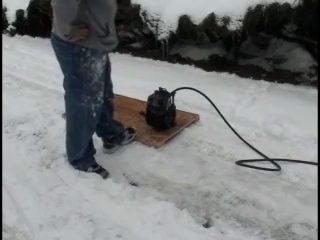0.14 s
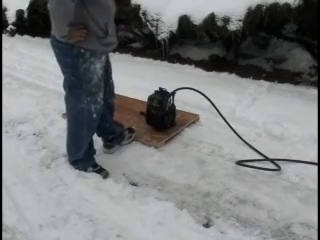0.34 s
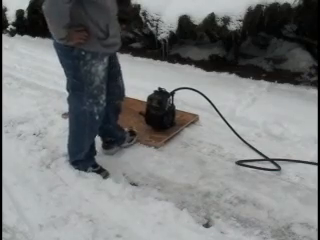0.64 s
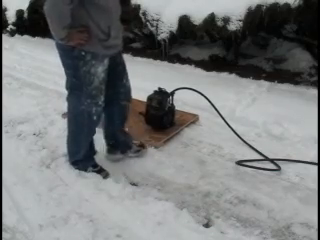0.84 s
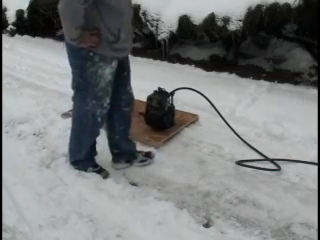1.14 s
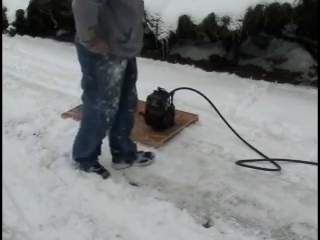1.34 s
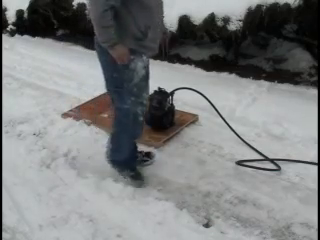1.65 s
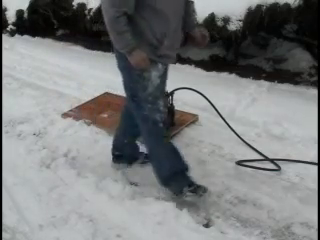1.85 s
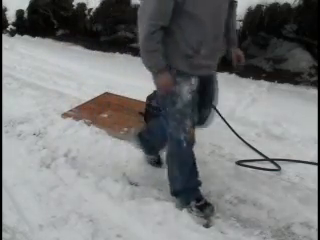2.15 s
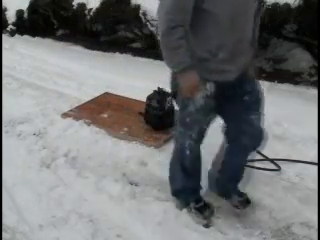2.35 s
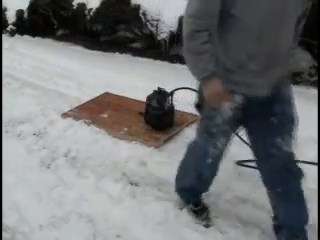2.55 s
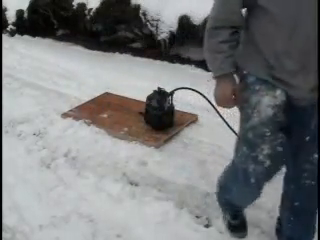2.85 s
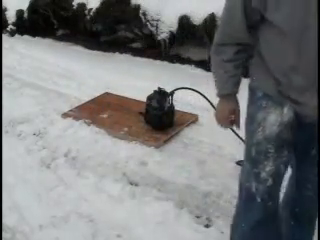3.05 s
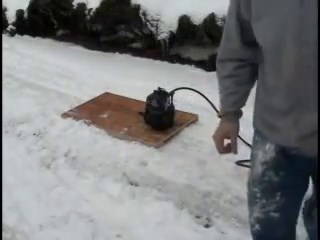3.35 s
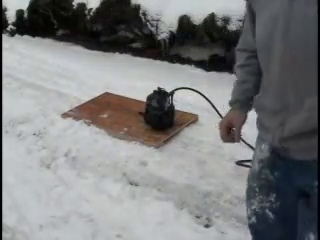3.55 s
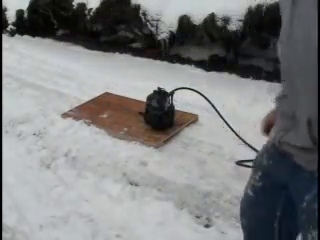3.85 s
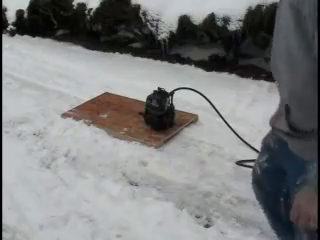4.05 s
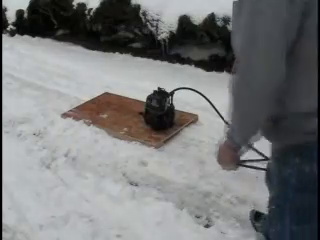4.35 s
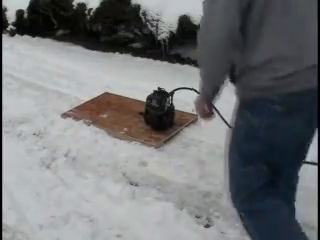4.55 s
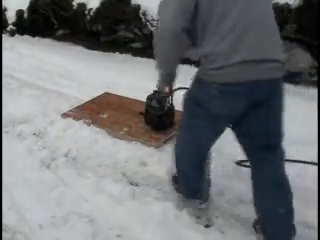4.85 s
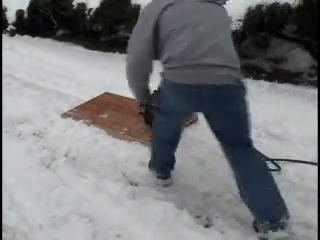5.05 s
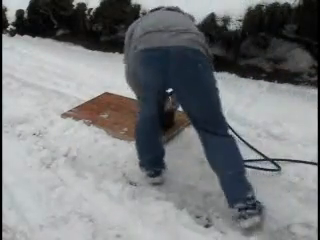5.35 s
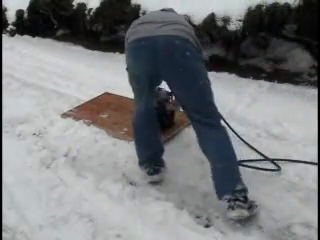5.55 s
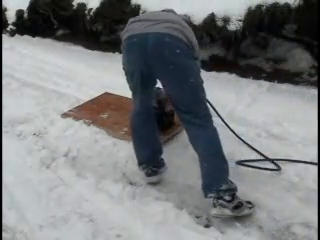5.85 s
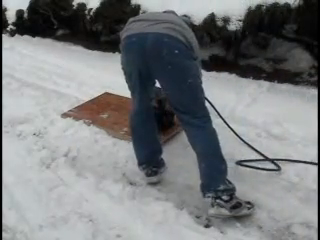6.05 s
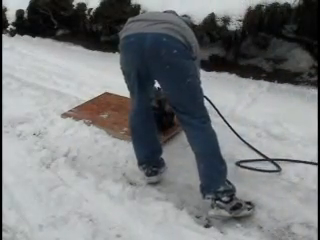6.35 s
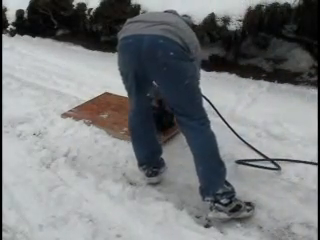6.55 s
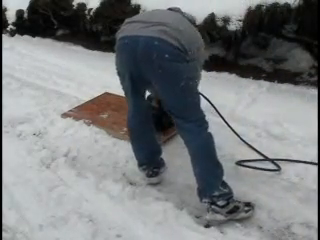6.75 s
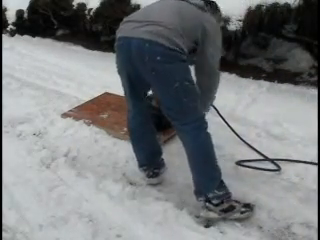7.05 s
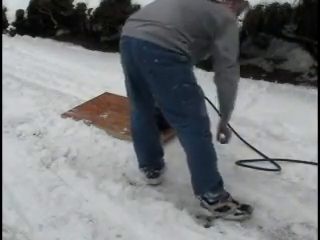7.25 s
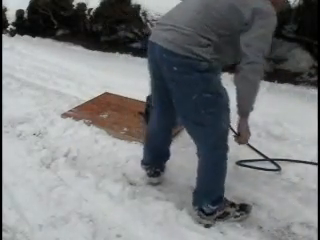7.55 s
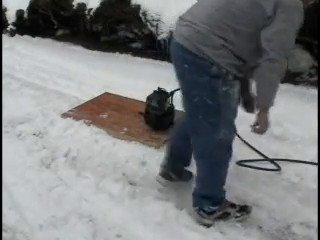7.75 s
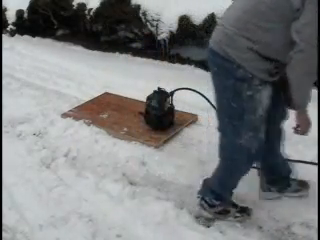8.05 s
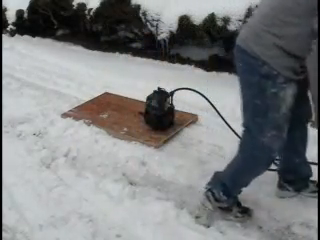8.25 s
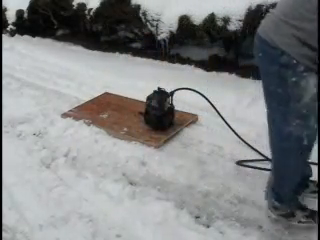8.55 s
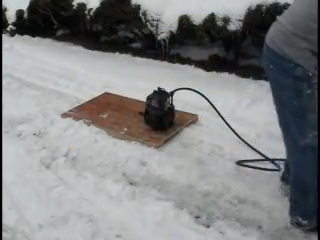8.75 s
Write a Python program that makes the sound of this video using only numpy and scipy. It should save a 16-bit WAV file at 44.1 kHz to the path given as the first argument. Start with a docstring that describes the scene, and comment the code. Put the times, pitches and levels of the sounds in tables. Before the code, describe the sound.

Outdoors in snow, a small single-cylinder engine runs at a steady fast beat, with throbbing exhaust, dull knocks, bright valve clacks and whirr. It swells slightly, bangs once, then coasts down in slowing, raspy chuffs and stops. In the quiet, boots scuff crunchy snow, a hand clacks machine parts, and birds chirp faintly over far traffic. The microphone is fixed, with the engine centred and little deep bass or extreme treble.

```python
"""A small single-cylinder engine is spun at steady speed on a board in the snow: tones locked to the cycle
throb in the exhaust, noise bursts and ringing make the knocks and clacks, over a whirr and far traffic.
It backfires once, a short blast of noise, then coasts down with ever slower chuffs of pulses and rasp, and stops.
Boots scuff the snow in grainy noise, a hand clacks parts of the machine, the snow crust snaps in short tones,
and birds chirp in the hedge with gliding two-voiced whistles."""
import sys
import numpy as np
from scipy import signal
from scipy.fft import rfft, irfft, next_fast_len
from scipy.io import wavfile
from scipy.ndimage import map_coordinates

SR = 44100
rng = np.random.default_rng(int(sys.argv[2]) if len(sys.argv) > 2 else 0)


def unload_wav(signal):
    """Save mono or channel-first audio to the path in sys.argv[1] as 16-bit WAV at rate SR, clipped to [-1, 1]."""
    wavfile.write(
        sys.argv[1],
        SR,
        np.round(np.clip(np.atleast_2d(signal).T, -1, 1) * 32767).astype(np.int16),
    )


N = 392047
T = np.arange(N) / SR  # time of every sample, seconds
# the spun engine: length of a cycle and first clack in seconds, number of cycles
CYCLE_S, FIRST_S, CYCLES = .05579, .0195, 50
BANG_S = 2.8275  # the backfire
REST_S, STOP_S = 4.15, 4.29  # the shaft stands still; the last cycle would end here


def amp(db):
    """Turns decibels into a factor on the wave."""
    return 10 ** (np.asarray(db) / 20)


def unit(x):
    """Scales x to an rms of 1."""
    return x / np.sqrt(np.mean(x ** 2) + 1e-20)


def unit_while_spun(x):
    """Scales x so that its rms before the backfire is 1."""
    return x / np.sqrt(np.mean(x[T < BANG_S] ** 2))


def along(points, hz):
    """Joins (Hz, dB) points on a log pitch axis and gives the factor at each hz."""
    f, v = np.transpose(points)
    return amp(np.interp(np.log(hz + 1), np.log(f + 1), v))


def gains(rows):
    """Gives one factor per sample for each dB column, near silent outside the table."""
    s, *columns = np.transpose(rows)
    return [amp(np.interp(T, s, c, left=-120, right=-120)) for c in columns]


def filtered(x, response):
    """Multiplies the spectrum of x by a response of frequency."""
    m = next_fast_len(N + SR // 2)
    return irfft(rfft(x, m) * response(np.fft.rfftfreq(m, 1 / SR)), m)[..., :N]


def noise(spectrum):
    """Makes random hiss with the given colour and an rms of 1."""
    return unit(filtered(rng.standard_normal(N), lambda hz: along(spectrum, hz)))


def wobble(rate):
    """Draws a smooth random curve through `rate` random points a second."""
    return map_coordinates(rng.standard_normal(int(N * rate / SR) + 4), [T * rate])


def add(out, s, x):
    """Mixes x into out from time s in seconds."""
    part = out[max(round(s * SR), 0):][:len(x)]
    part += x[:len(part)]


def blow(t60, rise):
    """Shapes one blow: a quick rise, then a fall of 60 dB in t60 seconds; its top is 1."""
    t = np.arange(SR // 10) / SR
    env = amp(-60 * t / t60) * (1 - np.exp(-t / rise)) ** 2
    return env / env.max()


def train(blows, starts, scatter_db):
    """Lays out the loudness of blows that return in every cycle, each a little louder or softer."""
    env = np.zeros(N)
    for delay, db, t60 in blows:
        shape = blow(t60, rise=.0016)
        for s, size in zip(starts, rng.normal(0, scatter_db, CYCLES)):
            add(env, s + delay, amp(db + size) * shape)
    return env


def struck(modes, blows, starts, sizes_db):
    """Rings the same metal tones at every blow, each a little off in pitch and strength."""
    out, t = np.zeros(N), np.arange(SR // 20)[:, None] / SR
    hz, level, t60 = np.transpose(modes)
    attack = (1 - np.exp(-t[:, 0] / 0.0011)) ** 2
    for delay, db, _ in blows:
        chances = rng.standard_normal((CYCLES, 3, len(modes)))
        for s, size, (gain, detune, phase) in zip(starts, sizes_db, chances):
            turn = 2 * np.pi * hz * (1 + .035 * detune) * t + 2 * phase
            ring = amp(level + 2.5 * gain - 60 * t / t60) * np.sin(turn)
            add(out, s + delay, amp(db + size) * ring.sum(axis=1) * attack)
    return out


def echoes(x, t60):
    """Smears x by a fading tail of random noise with energy 1."""
    t = np.arange(SR // 3) / SR
    tail = amp(-60 * t / t60) * rng.standard_normal(len(t))
    return signal.fftconvolve(x, tail / np.linalg.norm(tail))[:N]


# Low rumbling colour. Each row: pitch in Hz, relative strength in dB per Hz.
RUMBLE_COLOUR = [(20, -35.5), (53, -13), (125, 0.5), (210, 0), (320, -3), (450, -3.5), (700, -50)]


def rumble():
    """Low noise that swells and sinks at random."""
    return amp(2.8 * wobble(40)) * noise(RUMBLE_COLOUR)


# Tones of the exhaust. Each row: multiple of the cycle rate, relative level in dB.
DRONE_TONES = [(5, -15), (6, -13), (8, -6), (9, -3), (10, 0), (11, -2), (12, -10), (14, -11), (15, -1),
               (16, -6), (17, -12), (18, -12)]
# One sharp push per cycle: place in the cycle and width in seconds, level in dB, fading time in seconds
PUSH_AT_S, PUSH_S, PUSH_DB, PUSH_UNTIL_S = -.012, .00065, -12, .5


def exhaust_throb(exhaust):
    """Exhaust pulses as multiples of the cycle rate, with rumble and, early on, a sharp push in each cycle."""
    turn = 2 * np.pi * (T - FIRST_S + .008) / CYCLE_S
    settle = .4 + 2.2 * np.exp(-T / .3)  # the tones waver more until the speed has settled
    drone = np.zeros(N)
    for k, db in DRONE_TONES:
        # the muffler spreads each pulse over the cycle: phase grows with the square of the multiple
        spread = .6 * (k - 10) ** 2
        drone += amp(db + 2.2 * wobble(4.93)) * np.cos(k * turn + spread + settle * wobble(12))
    throb = exhaust * (unit(drone) + .4 * rumble())
    # seconds from the middle of the nearest push
    since = ((T - FIRST_S - PUSH_AT_S) / CYCLE_S + .5) % 1 * CYCLE_S - CYCLE_S / 2
    push = (1 - (since / PUSH_S) ** 2) * np.exp(-(since / PUSH_S) ** 2 / 2)
    return throb + amp(PUSH_DB + 2 * wobble(18)) * push / (1 + (T / PUSH_UNTIL_S) ** 6)


RING_DB = -5  # base level of the ringing in a blow
# Blows in each cycle. Each row: seconds after the clack, relative level in dB, time to fade by 60 dB in seconds.
BLOCK_KNOCKS = [(-.021, -1, 0.0067), (-.016, 0.5, 0.015), (-.0015, 3.5, 0.02)]
# Colour of the knocks. Each row: pitch in Hz, relative strength in dB per Hz.
BLOCK_COLOUR = [(300, -25), (700, -3.5), (1040, 2), (1390, 7.5), (1900, -4), (3500, -8)]
# Tones of the block. Each row: pitch in Hz, relative level in dB, time to fade by 60 dB in seconds.
BLOCK_TONES = [(804, -5.5, .03), (1040, -6.5, .04), (1381, 0, .05), (1603, -2, .03)]


def block_knocks(starts):
    """The engine block is knocked: bursts of dull noise and short ringing."""
    ring = unit_while_spun(struck(BLOCK_TONES, BLOCK_KNOCKS, starts, rng.normal(0, 2, CYCLES)))
    bursts = unit_while_spun(train(BLOCK_KNOCKS, starts, 3.0)) * noise(BLOCK_COLOUR)
    return amp(-3) * bursts + amp(RING_DB + 2) * ring


# Valve blows in each cycle. Each row: seconds after the clack, relative level in dB,
# time to fade by 60 dB in seconds.
VALVE_CLACKS = [(-.0004, 0, .012), (.018, -14, .015)]
# Colour of the clacks. Each row: pitch in Hz, relative strength in dB per Hz.
STEEL_COLOUR = [(900, -40.5), (2000, -2), (3100, -5), (3900, 5), (5300, 2), (6100, -5.5), (6800, 0.5),
                (8000, -5), (9500, -12)]
# Tones of the valve gear. Each row: pitch in Hz, relative level in dB, time to fade by 60 dB in seconds.
STEEL_TONES = [(3772, 0, .016), (5197, -1, .014), (6740, -4, .012)]


def valve_clacks(starts):
    """Steel parts of the valve gear hit each other: bursts of bright noise and short ringing."""
    ring = unit_while_spun(struck(STEEL_TONES, VALVE_CLACKS, starts, np.zeros(CYCLES)))
    bursts = unit_while_spun(train(VALVE_CLACKS, starts, 1.3)) * noise(STEEL_COLOUR)
    return amp(-1) * bursts + amp(RING_DB) * ring


# Whirr between the blows. Each row: time in seconds, level in dB before its flutter.
WHIRR_LEVEL = [(0, -25), (1.85, -27), (2.2, -21), (2.5, -22.5), (2.8, -25.5), (2.95, -20), (3.12, -22),
               (3.4, -27), (3.85, -30), (4.02, -40.5), (4.17, -39), (4.3, -45), (4.45, -58.5)]
# Colour of the whirr. Each row: pitch in Hz, relative strength in dB per Hz.
GEAR_COLOUR = [(240, -7.5), (450, -2), (800, 0.5), (1800, 0), (3300, -5), (4700, -4.5), (6100, -9),
               (8900, -23.5)]
# Swell in each coasting cycle: full depth in dB, share of the cycle, seconds to grow to full depth
BREATHE_DB, BREATHE_AT, BREATHE_S = 6, 0.38, 0.66
DULL_HZ = 4200  # the whirr is duller after the bang: its noise falls away above this pitch


def gear_whirr():
    """Chattering noise of the moving parts; after the bang it is duller, rumbles and swells in each cycle."""
    level, = gains(WHIRR_LEVEL)
    starts = [row[0] for row in COAST_CYCLES]
    cycle = np.interp(T, starts + [STOP_S], np.arange(len(starts) + 1))
    depth_db = BREATHE_DB * np.clip((T - BANG_S) / BREATHE_S, 0, 1)
    breathe = amp(depth_db * np.cos(2 * np.pi * (cycle - BREATHE_AT)))
    gears = noise(GEAR_COLOUR)
    dull = filtered(gears, lambda hz: 1 / np.sqrt(1 + (hz / DULL_HZ) ** 4))
    gears = np.where(T > BANG_S, dull, gears)
    board = (T > BANG_S) * amp(-3) * rumble()  # the freed engine shakes its board
    chatter = amp(3.2 * wobble(110))  # loose parts chatter
    return level * breathe * (chatter * gears + board)


# The spun engine. Each row: time in seconds, then base levels in dB of exhaust, knocks and clacks.
RUN_LEVELS = [(0, -28, -29, -23.5), (.35, -25, -29, -23.5), (.5, -19, -24, -23.5), (.7, -24, -27.5, -24),
              (1.9, -23.5, -27, -23.5), (2.1, -18.5, -23.5, -31), (2.4, -18, -24, -26.5),
              (2.55, -21.5, -25, -23.5), (2.81, -24.5, -24.5, -24.5)]


def engine():
    """The spun engine: throb, knocks and clacks keep the beat of one shaft, and the parts whirr."""
    exhaust, knock, clack = gains(RUN_LEVELS)
    slack = rng.normal(0, .0004, CYCLES)  # slack in the valve gear, seconds
    starts = FIRST_S + CYCLE_S * np.arange(CYCLES) + slack
    blows = knock * block_knocks(starts) + clack * valve_clacks(starts)
    return exhaust_throb(exhaust) + blows + gear_whirr()


# Far traffic and hiss. Each row: pitch in Hz, relative strength in dB per Hz.
AIR_COLOUR = [(25, -22), (60, -1.5), (140, 4.5), (360, -1.5), (475, -17), (540, -9), (800, -9.5),
              (1800, -22.5), (4200, -18.5), (8900, -36)]


def far_air():
    """Far traffic and hiss as slowly wavering noise: one part for the middle, a weaker one for the sides."""
    level = amp(-52 + 1.2 * wobble(5))
    return level * noise(AIR_COLOUR), amp(-20.5) * level * noise(AIR_COLOUR)


# Colour of blast and puffs. Each row: pitch in Hz, relative strength in dB per Hz.
BLAST_COLOUR = [(60, -31.5), (150, 0), (1060, 3.5), (2600, -9), (4400, -10.5), (8900, -23)]
BANG_DB = 1.5
AFTER_S, AFTER_DB = 0.017, -11  # echo of the bang: seconds after the bang, dB against the bang


def backfire():
    """Unburnt gas goes off in the muffler: a short broad blast of noise and a weaker echo of it."""
    env = np.zeros(N)
    add(env, BANG_S, amp(BANG_DB) * blow(0.016, rise=0.001))
    add(env, BANG_S + AFTER_S, amp(BANG_DB + AFTER_DB) * blow(0.012, rise=0.0011))
    return env * noise(BLAST_COLOUR)


# Coasting cycles. Each row: valve clack in seconds, clack level in dB, chuff in seconds,
# pop level in dB, flutter level in dB, flutter pitch in Hz. Levels are before flicker and echoes.
COAST_CYCLES = [(2.872, -32.5, 2.889, -13.5, -19.5, 400), (2.934, -33, 2.955, -12.5, -20, 400),
                (2.998, -31, 3.014, -13, -16, 400), (3.0654, -21.5, 3.088, -9, -16, 400),
                (3.1388, -27, 3.164, -7, -17, 400), (3.2174, -20, 3.245, -4, -6, 385),
                (3.3054, -19.5, 3.334, -9.5, -7, 408), (3.4017, -21, 3.436, -4, -9, 414),
                (3.5114, -21, 3.551, -6, -7, 414), (3.6351, -24, 3.685, -24.5, -6, 376),
                (3.7884, -20, 3.85, -23.5, -6, 385), (3.9851, -31, 4.086, -30.5, -4, 403)]
# Dull thuds of each coasting cycle. Each row: share of the cycle, level in dB.
THUD_PLACES = [(.012, -14), (.7, -24)]
# Pitch in Hz, length in seconds, rasp in dB against the tone
THUD_HZ, THUD_S, THUD_RASP_DB = 226, .019, -20.5
POP_HZ, POP_S, POP_RASP_DB = 225, .012, -19
# Flutter: seconds after the pop, length as a share of the cycle, rasp in dB against the tone
FLUTTER_LAG_S, FLUTTER_SHARE, FLUTTER_RASP_DB = .011, .15, -14.5
# The flutter starts again: step as a share of the cycle, length factor, dB change each time
REBOUND_SHARE, REBOUND_LONG, REBOUND_DB = 0.11, .75, -8.5


def coast_ends():
    """Each coasting cycle ends where the next one starts."""
    return [row[0] for row in COAST_CYCLES[1:]] + [STOP_S]


def strokes():
    """Lists thuds, pop and rebounding flutter: start in s, level in dB, pitch in Hz, length in s, rasp in dB."""
    rows = []
    for (s, _, chuff, pop_db, flutter_db, flutter_hz), end in zip(COAST_CYCLES, coast_ends()):
        cycle = end - s
        for share, db in THUD_PLACES:
            if s + share * cycle < REST_S:
                rows.append((s + share * cycle, db, THUD_HZ, THUD_S, THUD_RASP_DB))
        rows.append((chuff, pop_db, POP_HZ, POP_S, POP_RASP_DB))
        for k in range(3):
            start = chuff + FLUTTER_LAG_S + k * REBOUND_SHARE * cycle
            length = FLUTTER_SHARE * cycle * (REBOUND_LONG if k else 1)
            rows.append((start, flutter_db + k * REBOUND_DB, flutter_hz, length, FLUTTER_RASP_DB - 5 * k))
    return rows


def suction_strokes():
    """A few sharp suction pulses per stroke, and the loudness of the rasp they open and close."""
    tone, rasp = np.zeros((2, N))
    for s, db, hz, length, rasp_db in strokes():
        t = np.arange(round(length * SR)) / SR
        swell = amp(db) * np.sin(np.pi * (t / length) ** 0.85) ** 1.4
        hz = hz * rng.normal(1, .008)  # pitch scatters from stroke to stroke
        turn = 2 * np.pi * hz * (t - .4 * length) + .35 * wobble(120)[:len(t)]
        over = amp(rasp_db + 8.5)  # a harsh flap has a strong overtone too
        add(tone, s, -.6 * swell * (np.cos(turn) + over * np.cos(2 * turn)))
        add(rasp, s, swell * amp(rasp_db) * (1 + np.cos(turn)))
    return tone, rasp


# Muffler tone: pitch in Hz, time to fade by 60 dB in seconds, level in dB against the pop
THUMP_HZ, THUMP_T60, THUMP_DB = 190, .045, -15


def pop_thumps():
    """The muffler rings on after each pop: a short fading tone, and the loudness of a puff."""
    thump, puff = np.zeros((2, N))
    t = np.arange(SR // 10) / SR
    for _, _, chuff, pop_db, *_ in COAST_CYCLES:
        fade = amp(pop_db + THUMP_DB - 60 * t / THUMP_T60)
        add(thump, chuff + POP_S / 2, fade * np.sin(2 * np.pi * THUMP_HZ * t))
        add(puff, chuff + POP_S / 3, amp(pop_db - 8) * blow(.012, rise=.0003))
    return thump, puff


# Later clacks of a coasting cycle. Each row: share of the cycle, level in dB.
LATER_CLACKS = [(.264, -22), (.605, -28)]


def coasting_clacks():
    """The valves still clack until the shaft rests: steel noise with a softer knock of the block."""
    env = np.zeros(N)
    for (s, db, *_), end in zip(COAST_CYCLES, coast_ends()):
        for share, level_db in [(0.0011, db)] + LATER_CLACKS:
            start = s + share * (end - s)
            if start < REST_S:
                add(env, start, amp(level_db) * blow(.04, rise=.001))
    return env * (noise(STEEL_COLOUR) + amp(-5.5) * noise(BLOCK_COLOUR))


# Colour of the rasp. Each row: pitch in Hz, relative strength in dB per Hz.
RASP_COLOUR = [(600, -14.5), (1300, 0), (1900, -11.5), (2300, -2.5), (2700, -9.5), (3300, 3.5),
               (3900, -7.5), (5000, -8), (6000, -15.5), (9000, -46.5)]


def coasting():
    """Ever slower chuffs: flickering suction pulses, rasp and puffs, with clacks and echoes."""
    tone, rasp = suction_strokes()
    thump, puff = pop_thumps()
    out = (tone + thump) * amp(2.2 * wobble(250))
    out = out + rasp * amp(4 * wobble(500) - 3) * noise(RASP_COLOUR)
    out = out + puff * noise(BLAST_COLOUR) + coasting_clacks()
    rattle = amp(-11) * echoes(out, t60=0.09)  # housing and board rattle on
    hedge = amp(-22.5) * echoes(out, t60=0.4)  # the hedge answers
    return out + rattle + hedge


# Steady rustle under the steps. Each row: time in seconds, level of the high part and of the low part in dB.
RUSTLE_LEVELS = [(4.1, -65, -62), (4.5, -49, -55.5), (4.7, -50, -63), (5.4, -49.5, -59.5),
                 (5.55, -58.5, -62), (6.6, -74, -74.5), (7.1, -65.5, -67.5), (7.6, -57, -59.5),
                 (8.3, -46.5, -48.5), (8.52, -54.5, -57.5), (8.6, -74, -73)]
# Colour of the high rustle. Each row: pitch in Hz, relative strength in dB per Hz.
CLOTH_COLOUR = [(2500, -25), (3800, -5.5), (5200, -0.5), (6500, -5.5), (8900, -9.5)]


def rustle():
    """Cloth and boots rustle: a bright and a lower noise that follow the table."""
    high, low = gains(RUSTLE_LEVELS)
    low_noise = noise([(500, -7.5), (1200, -1), (3000, -2), (5000, -14)])
    return high * noise(CLOTH_COLOUR) + low * low_noise


# Boots and cloth. Each row: start and length in seconds, base level of crunch and of low part in dB.
SCUFFS = [(4.24, 0.23, -53.5, -51.5), (4.466, .09, -46, -42.5), (4.59, .05, -52.5, -49),
          (4.864, 0.06, -46, -47.5), (5.036, 0.11, -39, -50.5), (5.164, 0.09, -48, -49),
          (5.251, 0.1, -41, -47.5), (5.335, .1, -45, -48.5), (7.616, 0.15, -49, -51.5),
          (8.069, 0.12, -48.5, -51), (8.19, 0.13, -40.5, -44), (8.762, 0.32, -44, -43)]
# Colour of the crunch. Each row: pitch in Hz, relative strength in dB per Hz.
SNOW_COLOUR = [(1200, -19), (2000, -5), (4300, 1.5), (6600, -1), (8900, -6.5)]


def snow_scuffs():
    """Snow crunches in dense grains: noise that swells per step and flickers very fast."""
    crunch, low = np.zeros((2, N))
    for s, length, db, low_db in SCUFFS:
        swell = np.sin(np.pi * np.linspace(0, 1, round(length * SR)) ** 0.55) ** 0.7
        add(crunch, s, amp(db) * swell)
        add(low, s, amp(low_db) * swell)
    grit = amp(3.5 * wobble(1200) + 1.3 * wobble(60))
    low_noise = noise([(200, -8), (800, -0.5), (1800, -4.5), (3500, -25)])
    return grit * (crunch * noise(SNOW_COLOUR) + low * low_noise)


# Sharp snaps of snow crust and small ticks. Each row: start in seconds, level of the tone in dB, pitch in Hz.
CRUST_SNAPS = [(4.866, -27, 1400), (5.092, -28, 3270), (5.359, -34, 3360), (5.390, -32, 3000),
               (5.978, -36, 1680), (7.352, -34, 2500), (7.714, -34, 590), (8.102, -33, 1000),
               (8.128, -32, 1400), (8.279, -26, 872), (8.295, -30, 832), (8.803, -20.5, 746),
               (8.848, -21, 851), (8.885, -20, 794)]


def crust_snaps():
    """Each snap is a tone of a few milliseconds with a dull crack of noise."""
    tone, crack = np.zeros((2, N))
    t = np.arange(SR // 10) / SR
    for s, db, hz in CRUST_SNAPS:
        add(tone, s, -amp(db) * amp(-60 * t / 0.007) * np.sin(2 * np.pi * hz * t))
        add(crack, s, amp(db - 7 - 60 * t / .012))
    return tone + crack * noise([(300, -10), (900, 0), (1800, -2), (4500, -18)])


# Parts under a hand. Each row: start in seconds, level of the body in dB, base level of the top in dB.
HAND_CLACKS = [(5.7629, -30, -29), (5.843, -27.5, -54.5), (6.1307, -36, -64.5), (6.2048, -35, -70.5)]
# Colour of the body. Each row: pitch in Hz, relative strength in dB per Hz.
PARTS_COLOUR = [(450, -6), (850, 0), (1400, -5), (2000, 4), (2500, -12), (3200, -4), (4500, -8.5),
                (9000, -28)]


def hand_clacks():
    """Parts clack dryly under a hand: a body that fades fast, then slower, and a bright top."""
    body, top = np.zeros((2, N))
    for s, db, top_db in HAND_CLACKS:
        add(body, s, amp(db) * (blow(0.04, rise=0.0006) * .6 + .4 * blow(0.18, rise=0.00096)))
        add(top, s, amp(top_db) * blow(0.054, rise=0.00043))
    top_noise = noise([(3500, -33), (5400, -10.0), (7300, 11.0), (9000, -1)])
    return body * noise(PARTS_COLOUR) + top * top_noise


def person():
    """Someone on the snow: rustle, scuffs, snaps and clacks together."""
    return rustle() + snow_scuffs() + crust_snaps() + hand_clacks()


# Chirps. Each row: start, rise and fall in seconds, first, top and last pitch in Hz,
# rough level at the top in dB.
CHIRPS = [(5.815, 0.01, 0.036, 3700, 3730, 3430, -50), (6.155, .01, .035, 4510, 4550, 4170, -52),
          (6.19, .015, 0.028, 3310, 3650, 3500, -50), (6.44, 0.016, 0.02, 3890, 4800, 3580, -46),
          (6.487, .013, 0.048, 3290, 3710, 2870, -45.5), (6.545, 0.0094, 0.04, 4110, 4240, 4070, -47),
          (6.575, 0.017, .1, 3396, 3590, 3450, -53), (6.812, .012, .008, 3000, 5490, 4570, -37.5),
          (6.825, 0.0042, 0.027, 4600, 4630, 4310, -39.5), (6.83, .005, 0.023, 4200, 4250, 2780, -39),
          (6.855, 0.0047, 0.048, 3910, 3994, 2280, -38), (7.21, 0.03, 0.092, 2650, 4320, 3100, -50),
          (7.415, .045, 0.086, 2500, 4500, 3200, -46), (7.916, 0.038, .005, 3900, 5250, 5300, -51),
          (7.945, 0.066, 0.055, 2810, 4200, 3400, -48.5), (8.38, 0.0049, 0.09, 4900, 4960, 2050, -49),
          (8.455, .005, 0.031, 4400, 4440, 3330, -50), (8.48, 0.078, 0.13, 2400, 4360, 1560, -47),
          (8.65, .005, 0.047, 4520, 4500, 2900, -54)]
# Far twitter. Each row: start, rise and fall in seconds, first, top and last pitch in Hz,
# rough level at the top in dB.
FAR_TWITTER = [(6.235, .02, 0.099, 4600, 5100, 4580, -54), (6.28, 0.01, 0.094, 3800, 3930, 3080, -52.5)]
CHIRP_BLUR_HZ, TWITTER_BLUR_HZ = 35, 350  # size of the pitch jitter; distance blurs the twitter
THROAT_HZ, THROAT_DB = 3700, 3  # the throat favours this pitch
FADE_IN_DB, FADE_OUT_DB = -6, -5  # level at the ends of a chirp, below its top
# A second voice runs below the first by this share of the rise, then joins it; its level against the first
SPLIT, SECOND_DB = .2, -5


def birds():
    """Two-voiced whistles glide up to a rounded top and down, loudest near the throat's pitch; a hedge echoes."""
    out = np.zeros(N)
    for rows, blur_hz in [(CHIRPS, CHIRP_BLUR_HZ), (FAR_TWITTER, TWITTER_BLUR_HZ)]:
        for s, rise, fall, from_hz, top_hz, to_hz, db in rows:
            t = np.arange(0, rise + fall, 1 / SR)
            up = np.clip(1 - t / rise, 0, 1)  # 1 at the start, 0 at the top
            down = np.clip((t - rise) / fall, 0, 1)  # 0 at the top, 1 at the end
            climb = (from_hz - top_hz) * np.sin(np.pi / 2 * up) ** 2
            drop = (to_hz - top_hz) * down ** 1.3
            glide = top_hz + climb + drop + blur_hz * wobble(1500)[:len(t)]
            below = glide - SPLIT * (top_hz - from_hz) * (1 - down) * (1 - up / 2)
            edge = np.clip(np.minimum(t, rise + fall - t) / 0.0023, 0, 1)
            throat_db = THROAT_DB * np.exp(-((glide - THROAT_HZ) / 400) ** 2)
            level = amp(db + FADE_IN_DB * up + FADE_OUT_DB * down + throat_db - THROAT_DB / 2)
            first, second = 2 * np.pi * np.cumsum([glide, below], axis=1) / SR
            add(out, s, edge * level * (np.sin(first) + amp(SECOND_DB) * np.sin(second)))
    out = out * amp(3.4 * wobble(250))
    return out + amp(-4) * echoes(out, t60=.3)


def scene():
    """The engine sits dead centre; birds, air and person differ a little between left and right."""
    machine = engine() + backfire() + coasting()
    air_mid, air_side = far_air()
    hand, far = person(), birds()
    mid = machine + hand + far + air_mid
    side = amp(-8.5) * echoes(far, t60=0.072) + amp(-31.0) * echoes(hand, t60=.03) + air_side
    return np.array([mid + side, mid - side])


TOP_HZ = 8950  # nothing is kept above this pitch


def record(dry):
    """The microphone loses deep bass, the input rounds off peaks near full scale, the top is cut."""
    heard = filtered(dry, lambda hz: (1j * hz / (22 + 1j * hz)) ** 2)
    rounded = heard / (1 + np.abs(heard) ** 8) ** (1 / 8)
    return np.clip(filtered(rounded, lambda hz: hz < TOP_HZ), -1, 1)


dry = scene()
out = record(dry)
unload_wav(out)
```